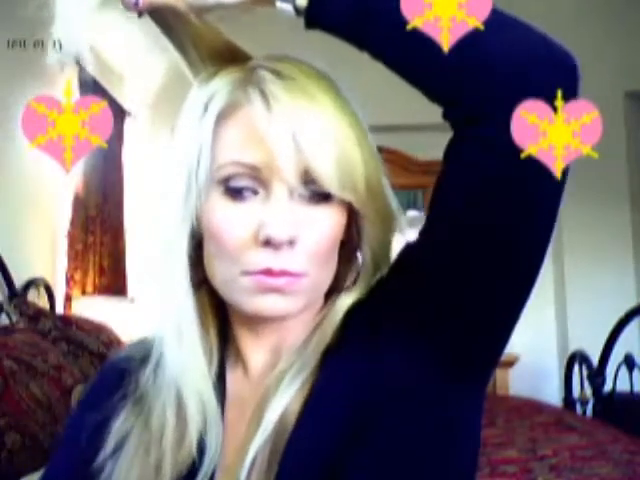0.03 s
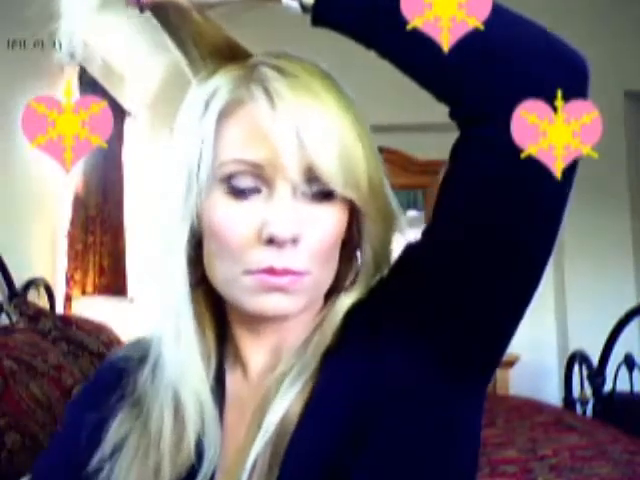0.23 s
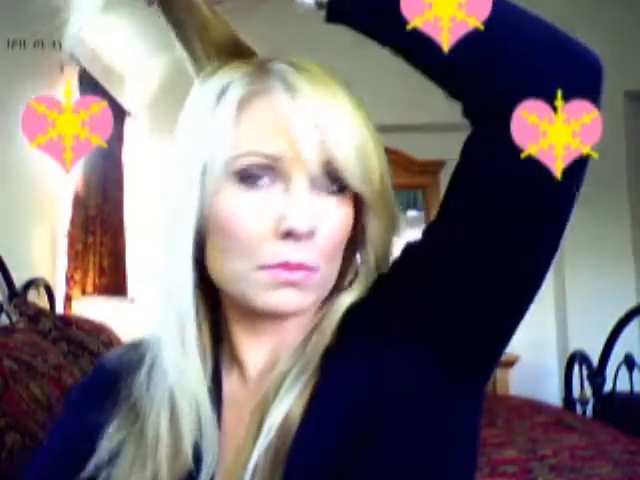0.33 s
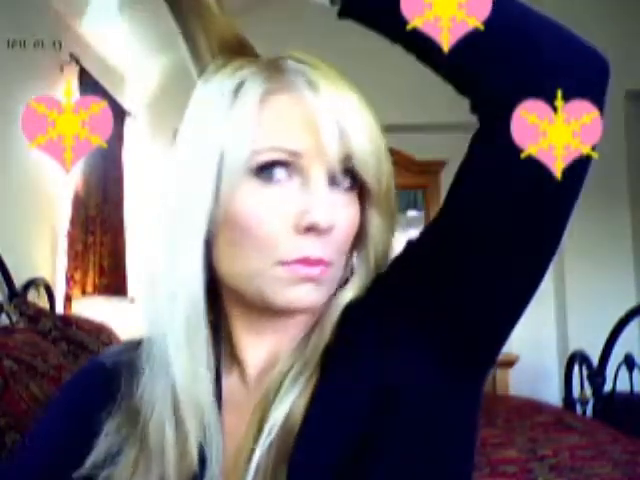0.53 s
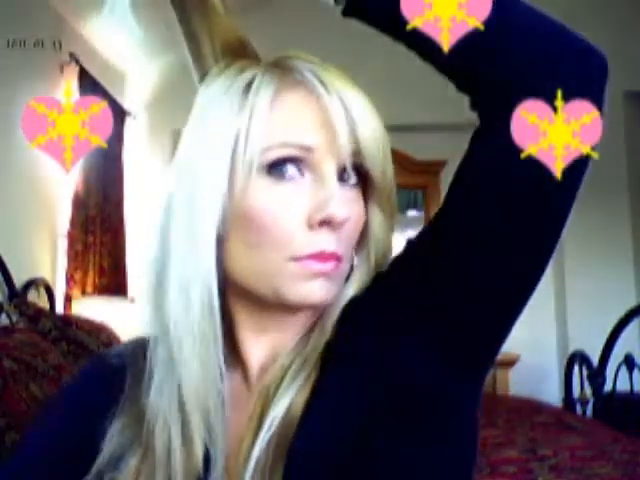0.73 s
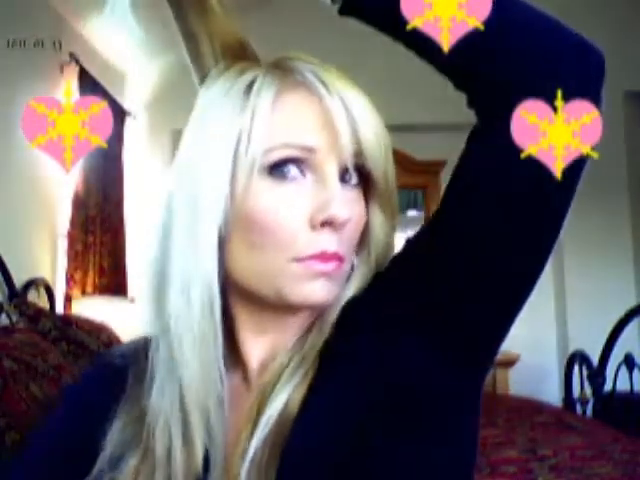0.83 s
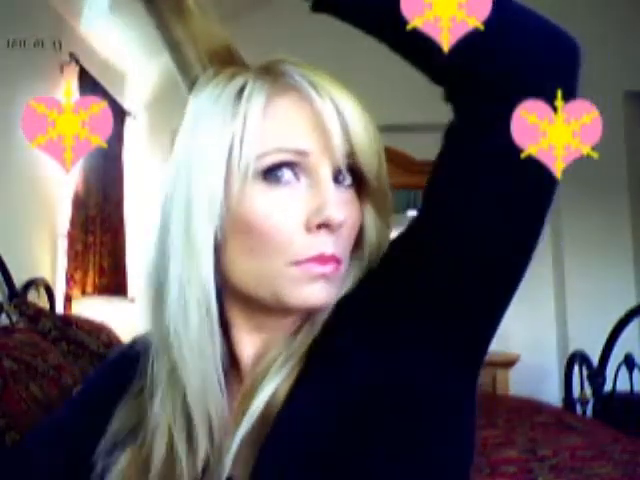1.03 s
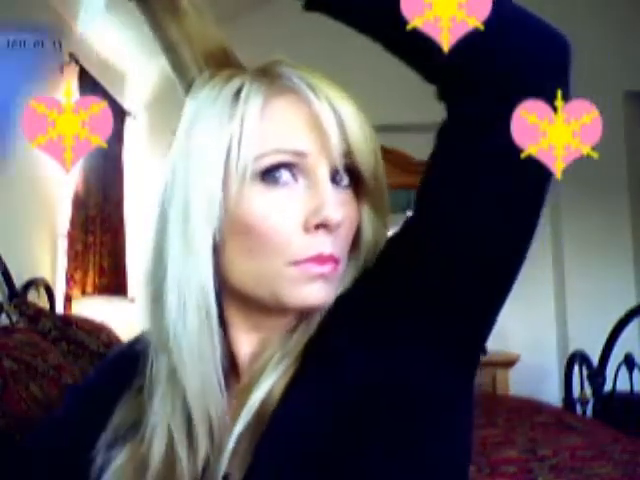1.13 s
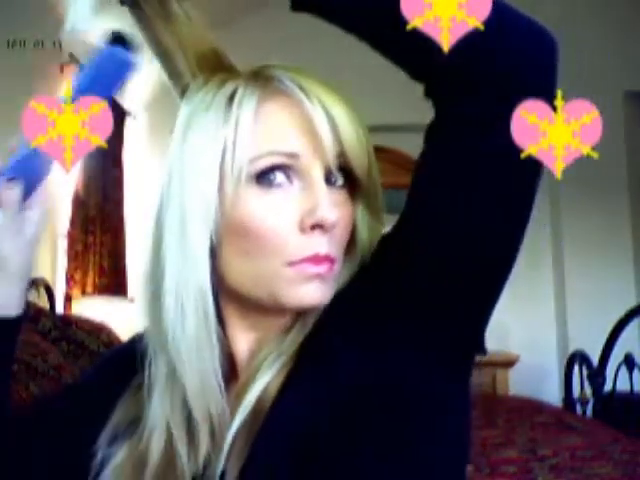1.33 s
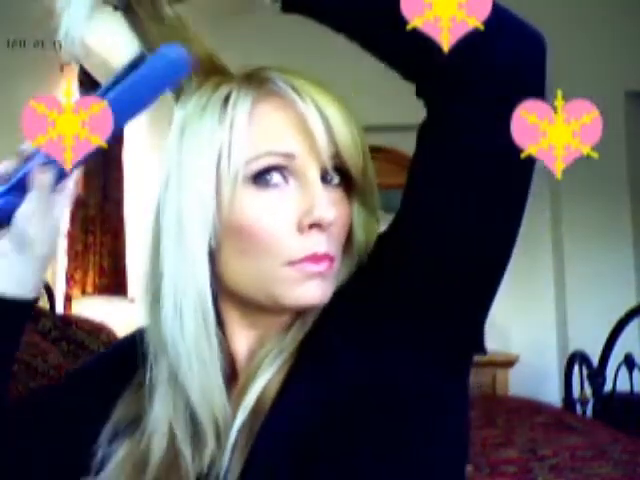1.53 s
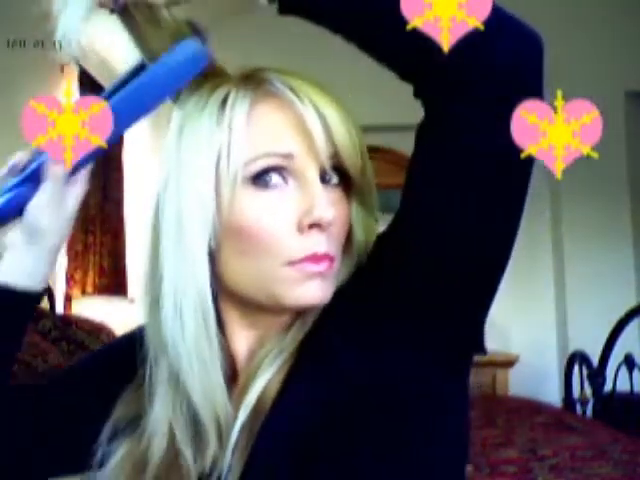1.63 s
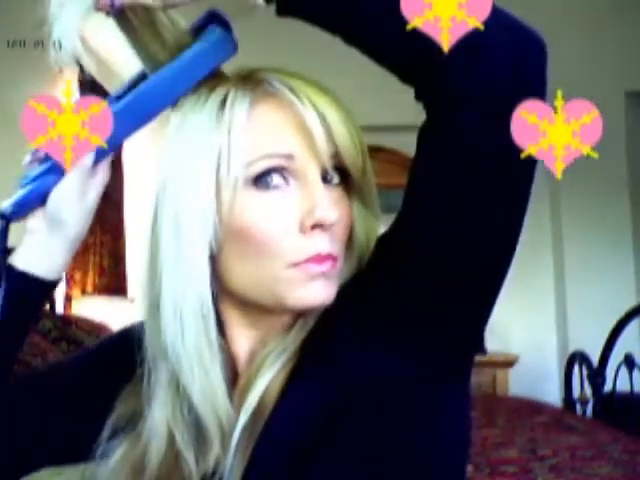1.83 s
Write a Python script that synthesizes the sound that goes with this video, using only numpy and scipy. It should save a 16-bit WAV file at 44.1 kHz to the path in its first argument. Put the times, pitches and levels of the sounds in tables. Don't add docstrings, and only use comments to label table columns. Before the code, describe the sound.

Faint hiss and low fan hum run throughout in a small room. At about 0.23 seconds a hard plastic tool cracks sharply against wood, with a low thud and two tiny scraping bounces by 0.29. Around 0.50 to 0.57 come quieter, muffled grip bumps and small hinge clicks. Noise suppression cuts the tails abruptly. Barely audible cable ticks follow near 0.88 to 0.91, then only quiet hum.

```python
import sys
import numpy as np
from scipy import signal
from scipy.fft import rfft, irfft
from scipy.io import wavfile
from scipy.ndimage import map_coordinates

SR = 44100
rng = np.random.default_rng(int(sys.argv[2]) if len(sys.argv) > 2 else 0)


def field_ratio(decibels):
    return 10 ** (np.asarray(decibels, dtype=float) / 20)


def file_out(sig):
    cols = np.atleast_2d(sig).T
    lim = np.clip(cols, -1, 1)
    pcm = np.round(lim * 32767).astype(np.int16)
    wavfile.write(sys.argv[1], SR, pcm)


N = 83790
TIME_S = np.arange(N) / SR

# start_s [s], crack_db [dB], body_db [dB], room_db [dB]
KNOCKS = [
    (.2308, -13.5, -13, -2),
    (.2322, -7.5, -12, -12.5),
    (.2390, -30, -16.5, -31.5),
    (.2702, -25.5, -32, -13.5),
    (.2912, -32, -38.5, -12.5),
]
# start_s [s], hinge_db [dB], grip_db [dB], room_db [dB]
TAPS = [
    (.0290, -55, -45, -87),
    (.0760, -65, -52, -70),
    (.5008, -34.5, -15.5, -39.5),
    (0.5051, -25.5, -16, -51),
    (0.5116, -52, -20, -48),
    (.5342, -49, -35.5, -41),
    (.5380, -28, -36.5, -39.5),
    (0.5441, -52, -21.5, -48.5),
    (.5666, -28, -25.5, -34),
    (.5718, -40, -18.5, -30),
]


def band(x, low_hz, high_hz):
    return signal.sosfilt(signal.butter(2, [low_hz, high_hz], "band", fs=SR, output="sos"), x)


def rms_one(x):
    return x / np.sqrt(np.mean(x ** 2) + 1e-20)


def drift(rate_hz):
    knots = rng.standard_normal(64)
    return map_coordinates(knots, [TIME_S * rate_hz], order=3, mode="wrap")


def coloured(points):
    hz, db = np.transpose(points)
    f = np.arange(N // 2 + 1) * SR / N + 1
    weight = field_ratio(np.interp(np.log(f), np.log(hz), db))
    return rms_one(irfft(rfft(rng.standard_normal(N)) * weight, N))


def ring(clicks, hz, t60_s):
    swell_cycles = 0.98
    w = 2 * np.pi * hz / SR
    r = field_ratio(-60 / (t60_s * SR))
    s = np.exp(-hz / (swell_cycles * SR))
    out = signal.lfilter([0, np.sin(w)], [1, -2 * r * np.cos(w), r * r], clicks + 1e-18)
    return signal.lfilter([2 * np.sin(w) * (1 - s)], [1, -2 * s * np.cos(w), s * s], out)


def struck(contacts, modes, column, grains, lag_s, contact_s):
    spread_db, grain_cut_hz = 3.5, 4600
    hits, out = np.array(contacts), 0
    luck = rng.standard_normal((len(hits), len(modes)))
    when = rng.random((len(hits), len(modes)))
    for k, (hz, db, t60_s) in enumerate(modes):
        clicks = grains * (rng.random(N) < .5) * field_ratio(db) / (1 + (hz / grain_cut_hz) ** 4)
        at = hits[:, 0] + lag_s * (np.sqrt(1000 / hz) - .4) + contact_s * when[:, k]
        sign = (-1) ** k
        clicks[(at * SR).astype(int)] += field_ratio(hits[:, column] + db + spread_db * luck[:, k]) * sign
        out = out + ring(clicks, hz, t60_s)
    return out / 3


def machine_hum():
    # pitch_hz [Hz], level_db [dB]
    tone_table = [(59.8, -68), (89.9, -50.5), (114.1, -70), (226.3, -75), (248.9, -67), (347.5, -77),
                  (373.3, -76), (397.2, -80), (794.3, -81), (844.2, -77), (961.9, -85), (1028.6, -86),
                  (1390.3, -85), (1588, -88)]
    waver_db, waver_hz = .8, .4
    out = 0
    for hz, db in tone_table:
        level = np.sqrt(2) * field_ratio(db + waver_db * drift(25))
        cycles = np.cumsum(hz + waver_hz * drift(4.2)) / SR
        out = out + level * np.sin(2 * np.pi * cycles + rng.uniform(0, 2 * np.pi))
    return out


def hiss():
    # pitch_hz [Hz], density_db [dB per Hz]
    hiss_spectrum = [(30, 8.5), (150, -4), (220, 2), (300, -10.5), (900, -9.5), (2500, -21), (7100, -26),
                     (8000, -53)]
    return field_ratio(-63) * coloured(hiss_spectrum)


def fan_air():
    centre_hz, width_hz = 860, 360
    noise = rng.standard_normal(N)
    return field_ratio(-74.5) * rms_one(band(noise, centre_hz - width_hz / 2, centre_hz + width_hz / 2))


def desk_sway():
    sway_hz, level_db, stop_s, fade_db_per_s = 48, -49, .74, 146
    sway = rms_one(band(rng.standard_normal(N), sway_hz * 0.69, sway_hz * 1.4))
    return sway * field_ratio(level_db - fade_db_per_s * np.maximum(TIME_S - stop_s, 0))


def cable_ticks():
    # start_s [s], level_db [dB]
    tick_table = [
        (.0765, -60),
        (.8775, -56),
        (.8870, -58),
        (.9140, -59),
    ]
    # pitch_hz [Hz], level_db [dB], t60_s [s]
    cable_modes = [(890, -1, 0.02), (1660, 14.5, 0.0054), (2030, 4, 0.0067), (2570, 4, 0.013),
                   (2870, -0.5, .012), (3800, -1, .008), (4680, 3, .008), (5600, 2.5, 0.0068)]
    return struck(tick_table, cable_modes, column=1, grains=np.zeros(N), lag_s=.0006, contact_s=.0003)


def room():
    # pitch_hz [Hz], density_db [dB per Hz]
    tail_spectrum = [(150, -34), (250, -2.5), (1200, -7.5), (1900, -9.5), (4600, -20), (5800, -19),
                     (7600, -29.5), (9000, -50.5)]
    level_db, patchy_db, rise_s = -22.5, 3.5, 0.001
    power = 0
    for contacts, t60_s in ((KNOCKS, .45), (TAPS, .085)):
        for start_s, *_, db in contacts:
            age = np.maximum(TIME_S - start_s, 0)
            power = power + field_ratio(2 * db - 120 * age / t60_s) * (1 - np.exp(-age / rise_s))
    return field_ratio(level_db + patchy_db * drift(150)) * np.sqrt(power) * coloured(tail_spectrum)


def desk():
    # start_s [s], level_db [dB], pitch_hz [Hz], t60_s [s]
    lurch_table = [(0.2323, -11, 157.8, 0.38), (0.236, -22, 212.6, 0.27), (0.2334, -25, 273.8, .12),
                   (0.2338, -34.5, 353, 0.13), (0.2323, -25.5, 104.8, 0.31), (0.2365, -22, 54, 1.9),
                   (.5020, -17, 217.6, 0.097), (0.5026, -20, 91, 0.26), (0.511, -8, 62.6, 0.049),
                   (.5280, -16.5, 53.1, .5), (0.531, -28.5, 161.2, 0.24), (0.5485, -19, 50.6, 0.76),
                   (0.549, -29.5, 106, .12)]
    rise_cycles, grab_s, grab_fade_s = 1.2, .49, .08
    stilled = np.clip((grab_s - TIME_S) / grab_fade_s, 0, 1)
    out = 0
    for start_s, db, hz, t60_s in lurch_table:
        age = np.maximum(TIME_S - start_s, 0)
        swell = 1 - np.exp(-age * hz / rise_cycles)
        mode = field_ratio(db - 60 * age / t60_s) * swell * np.sin(2 * np.pi * hz * age)
        out = out + mode * (stilled if start_s < grab_s else 1)
    return out


def pickup():
    # pitch_hz [Hz], level_db [dB], t60_s [s]
    hinge_modes = [(3820, 2.5, 0.0053), (4170, 4.5, .007), (4810, 2, 0.011), (5420, -2, 0.0097),
                   (6400, -6, 0.0099), (6710, -5, 0.0017), (7883, -16, 0.0043)]
    # pitch_hz [Hz], level_db [dB], t60_s [s]
    grip_modes = [(146.6, -2, 0.12), (262, -1, 0.055), (352, -9.5, 0.029), (470, -0.5, 0.025),
                  (585, -0.5, 0.022), (705, -1.5, 0.043), (997, 2.5, 0.019), (1363, -4.5, 0.022),
                  (1760, -10.5, 0.016), (2160, -11.5, 0.023)]
    light = dict(grains=np.zeros(N), lag_s=.0006, contact_s=.0003)
    return struck(TAPS, hinge_modes, column=1, **light) + struck(TAPS, grip_modes, column=2, **light)


def scrape():
    # start_s [s], length_s [s]
    slide_table = [(.236, .03), (.268, .016), (.288, .04), (.500, .016), (.536, .013), (.547, .016),
                   (.567, .016)]
    slide_levels = [-45.5, -29.5, -42, -42, -43, -32, -47.5]
    grains_per_s = 4900
    strength = field_ratio(3.8 * np.minimum(rng.exponential(1, N), 4))
    grains = (rng.random(N) < grains_per_s / SR) * strength * rng.choice([-1, 1], N)
    swell = 0
    for (start_s, length_s), db in zip(slide_table, slide_levels):
        swell = swell + field_ratio(db - 10) * np.sin(np.pi * np.clip((TIME_S - start_s) / length_s, 0, 1))
    return grains * swell


def knock():
    # pitch_hz [Hz], level_db [dB], t60_s [s]
    crack_modes = [(2280, -4.5, 0.037), (2700, -5, 0.024), (3140, 0.5, 0.014), (3650, -8.5, 0.014),
                   (4030, -1.5, 0.018), (4400, -6.5, .01), (4450, -2.5, 0.024), (5250, -2, 0.0047),
                   (5723, 3.5, .01), (5640, 6, 0.0063), (6970, -7.5, 0.017), (7000, -9, 0.006),
                   (7130, -8, .007)]
    # pitch_hz [Hz], level_db [dB], t60_s [s]
    body_modes = [(540.5, 0, .05), (700, 2, .05), (868, 3, .05), (988.5, 2, 0.076), (1182, -12.5, 0.014),
                  (1232, -1.5, 0.067), (1451.4, -2.5, .03), (1780, -6.5, .02), (1797, 5.5, .025),
                  (1888, 0, 0.031), (2078, -3.5, 0.038)]
    grains = scrape()
    hard = dict(lag_s=.0022, contact_s=.0012)
    crack = struck(KNOCKS, crack_modes, column=1, grains=grains, **hard)
    body = struck(KNOCKS, body_modes, column=2, grains=grains * field_ratio(-2), **hard)
    return crack + body


def suppressor():
    open_times = [.228, .4995]
    # hold_s [s], closing rate [dB/s], shut_db [dB]
    gate_table = [
        (.088, 427, -23.5),
        (.084, 1197, -13.5),
    ]
    gain_db = np.zeros(N)
    for start_s, (hold_s, rate, shut_db) in zip(open_times, gate_table):
        closing = np.maximum(-rate * np.maximum(TIME_S - start_s - hold_s, 0), shut_db)
        after = TIME_S > start_s
        gain_db[after] = closing[after]
    return field_ratio(gain_db)


def scene():
    background = machine_hum() + hiss() + fan_air() + desk_sway()
    handling = room() + desk() + pickup() + knock()
    return (handling * suppressor() + cable_ticks() + background)[None]


def roll_off(x):
    return signal.sosfilt(signal.butter(12, 9000, fs=SR, output="sos"), x)


def record(dry):
    overload, cutoff_hz = 1.1, 8300
    rounded = overload * np.tanh(dry / overload)
    mix = signal.sosfilt(signal.butter(16, cutoff_hz, fs=SR, output="sos"), rounded)
    return roll_off(mix)


dry = scene()
out = record(dry)
file_out(out)
```